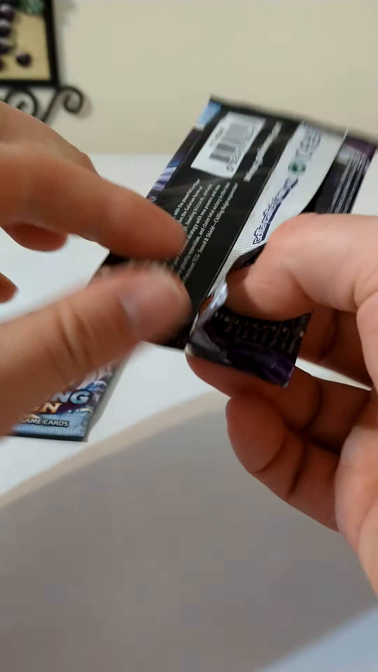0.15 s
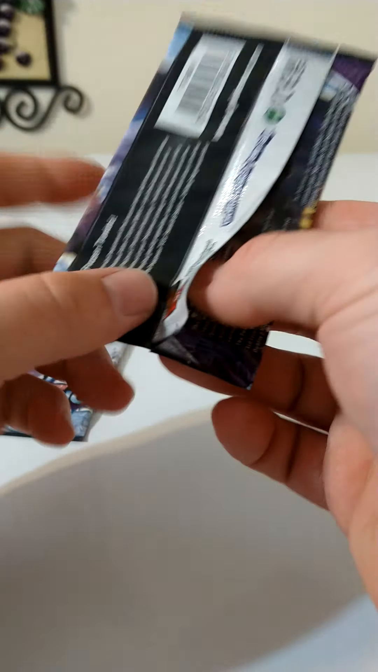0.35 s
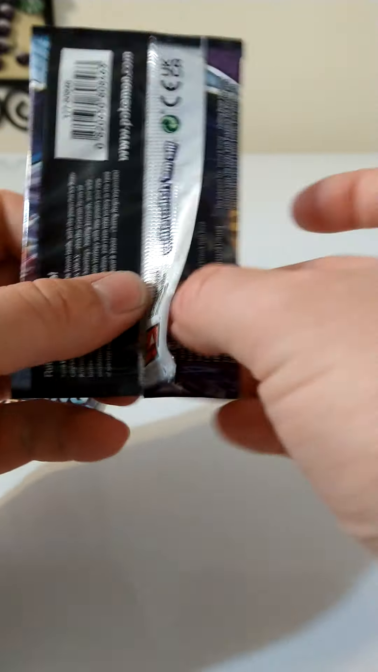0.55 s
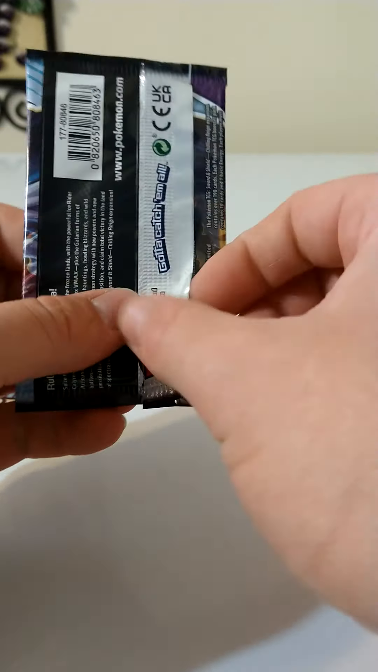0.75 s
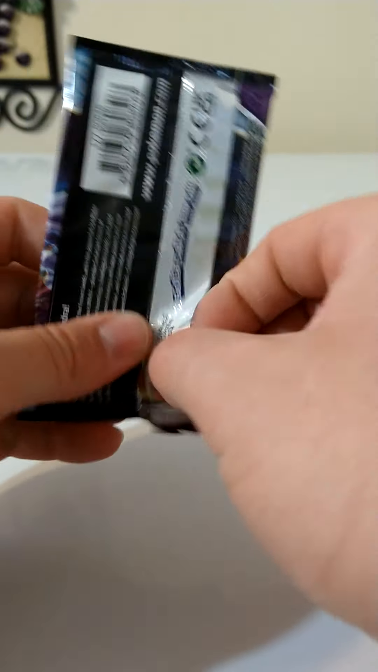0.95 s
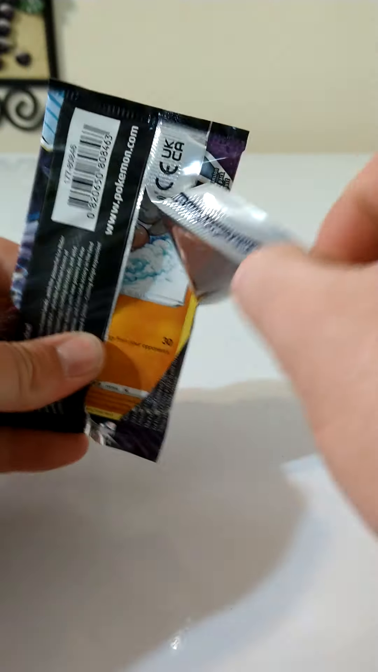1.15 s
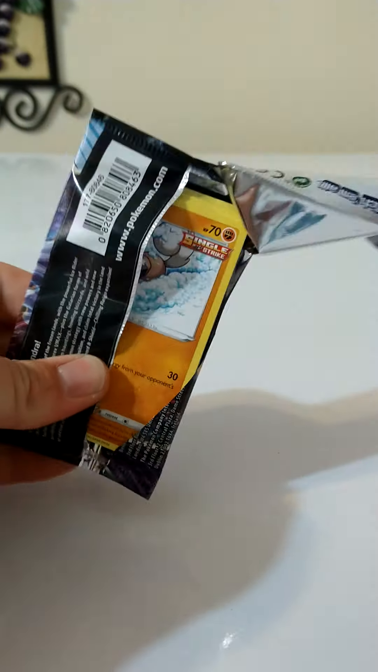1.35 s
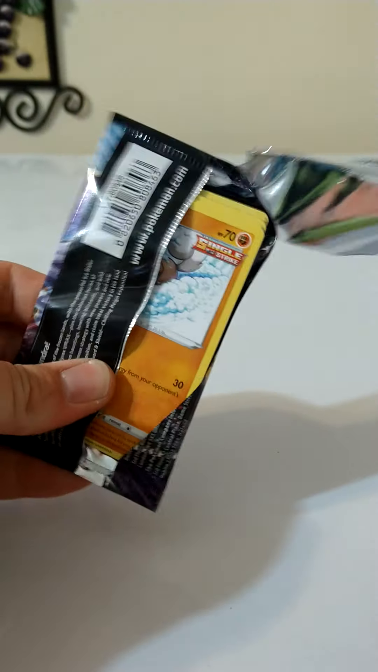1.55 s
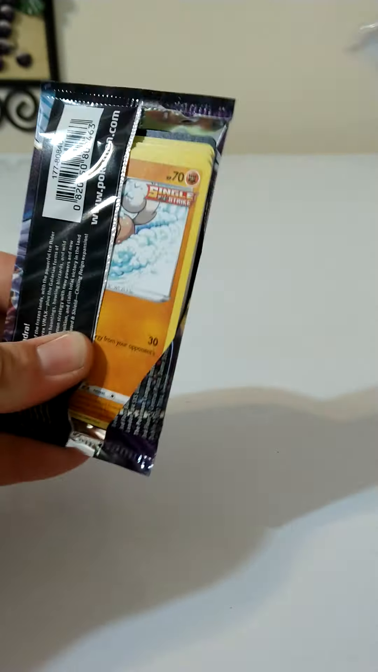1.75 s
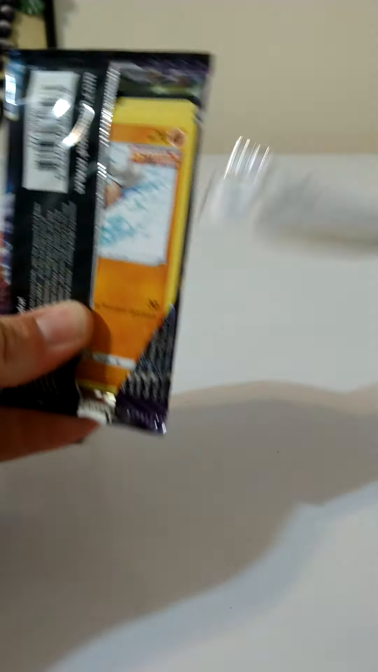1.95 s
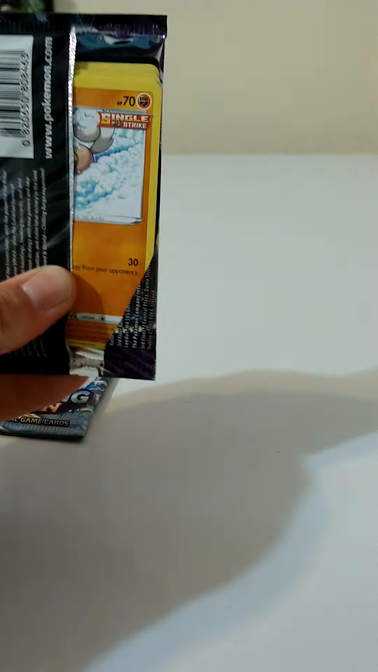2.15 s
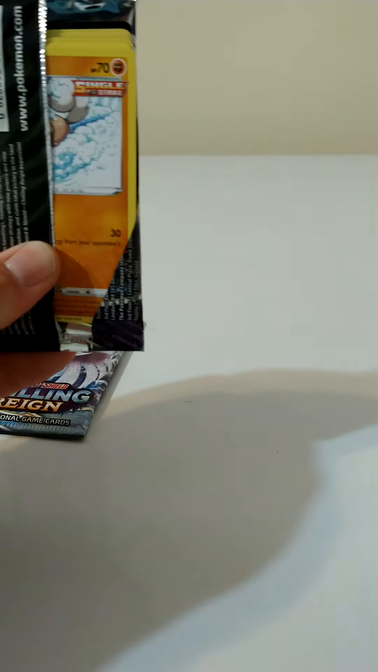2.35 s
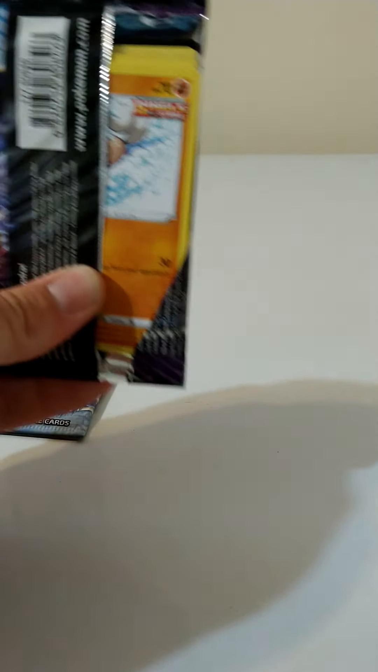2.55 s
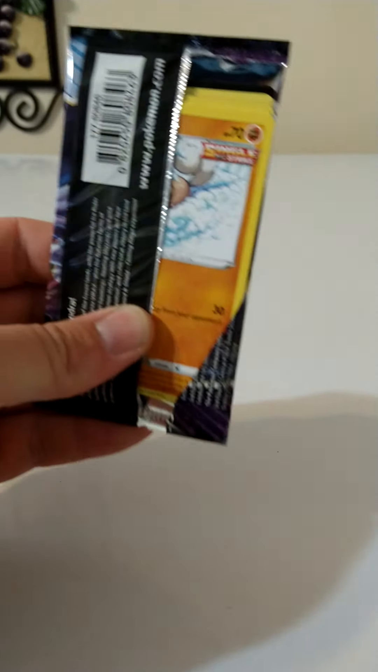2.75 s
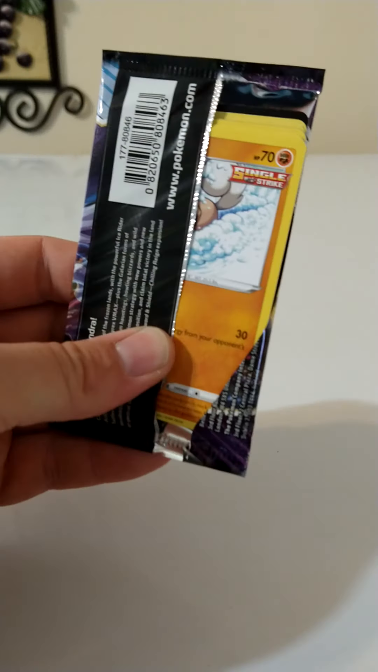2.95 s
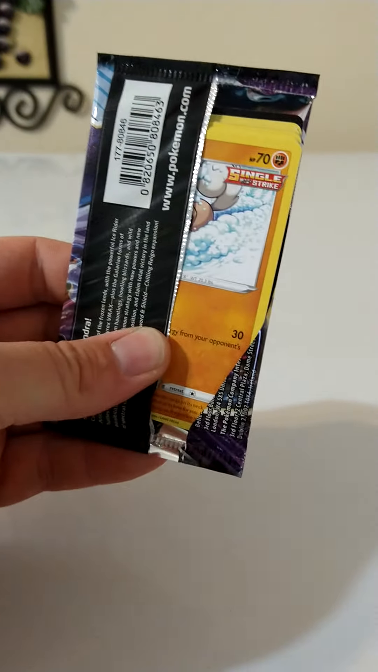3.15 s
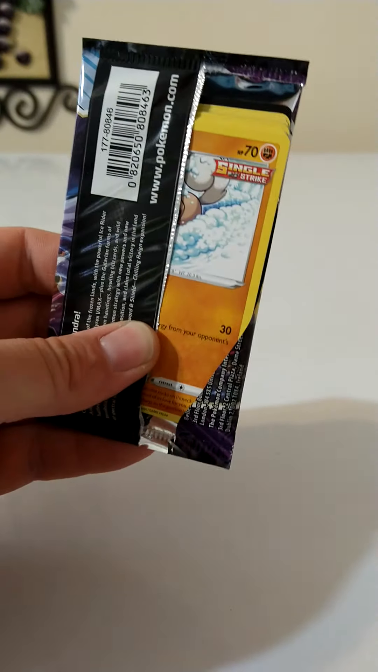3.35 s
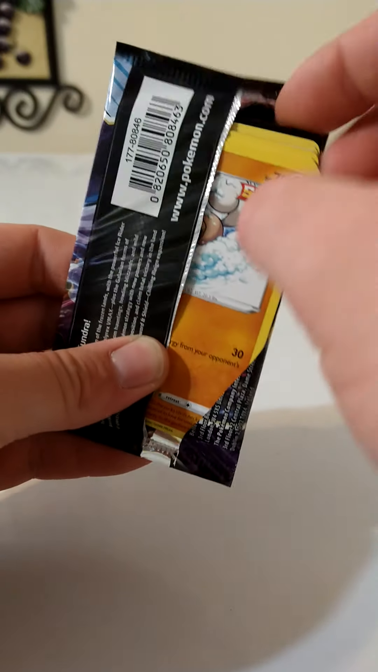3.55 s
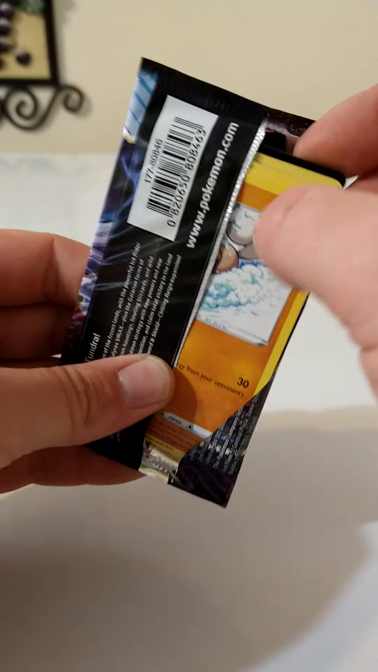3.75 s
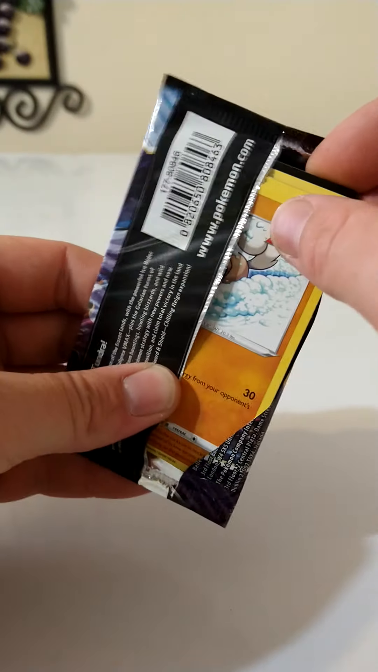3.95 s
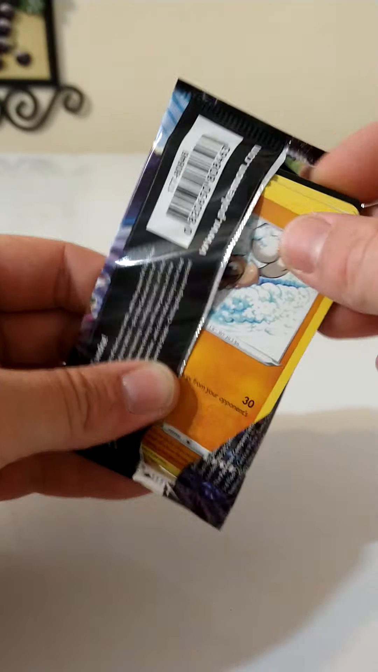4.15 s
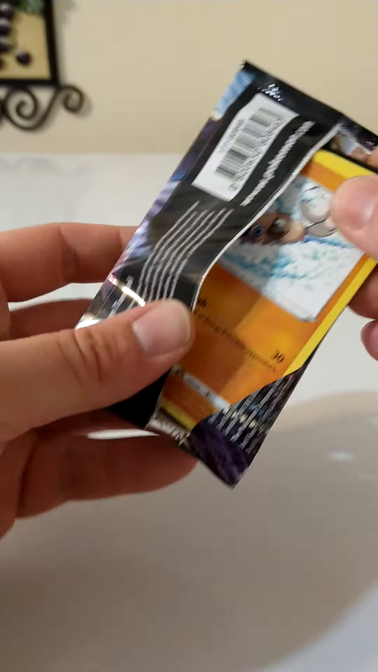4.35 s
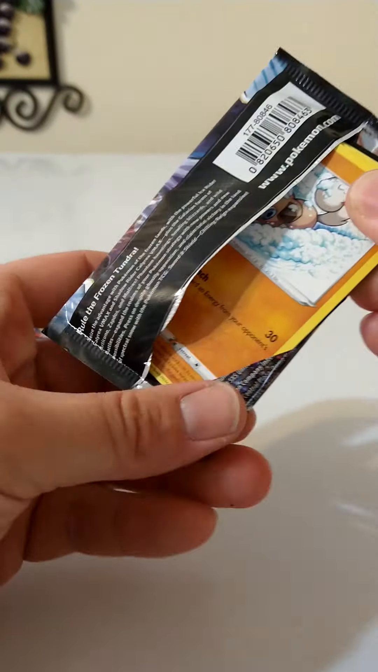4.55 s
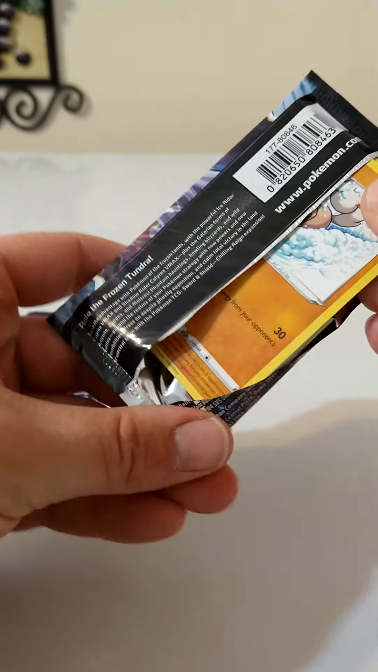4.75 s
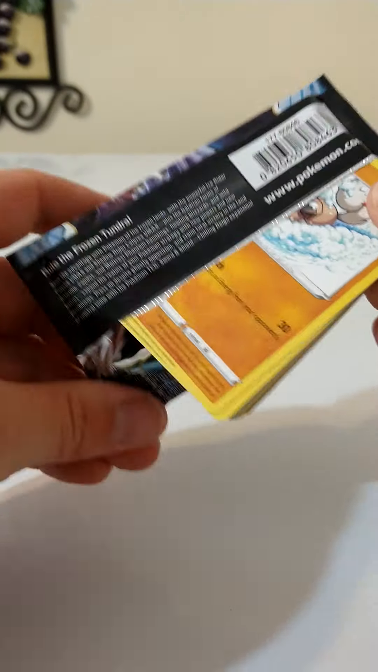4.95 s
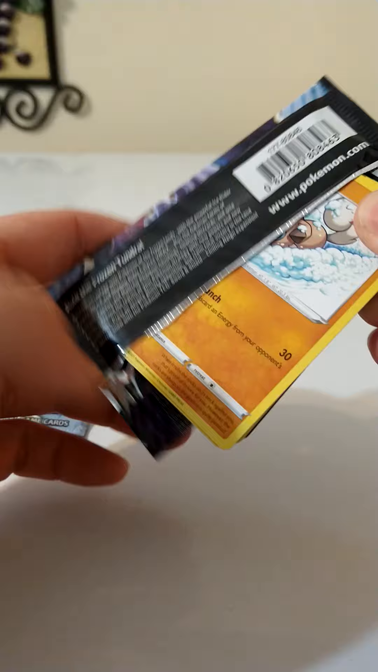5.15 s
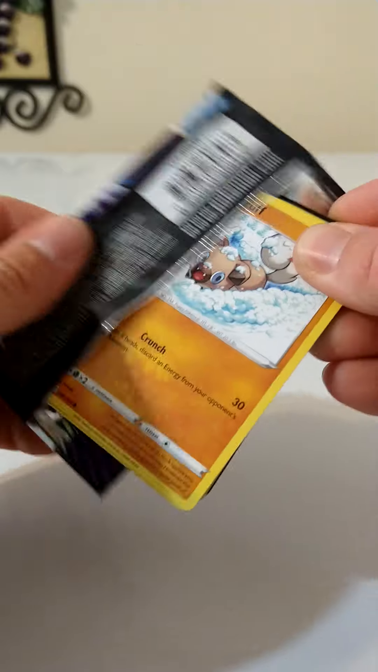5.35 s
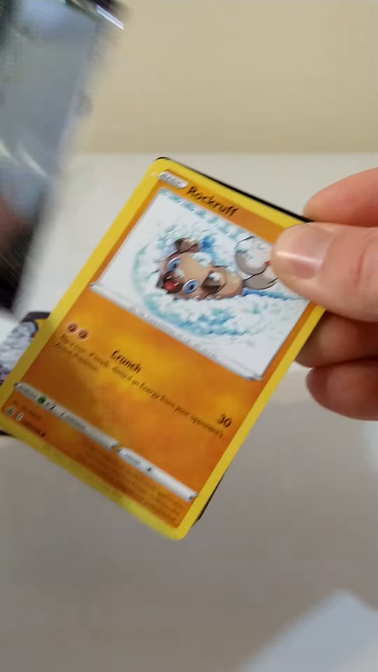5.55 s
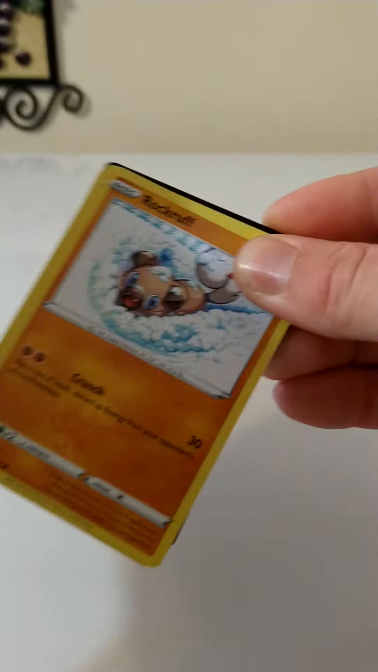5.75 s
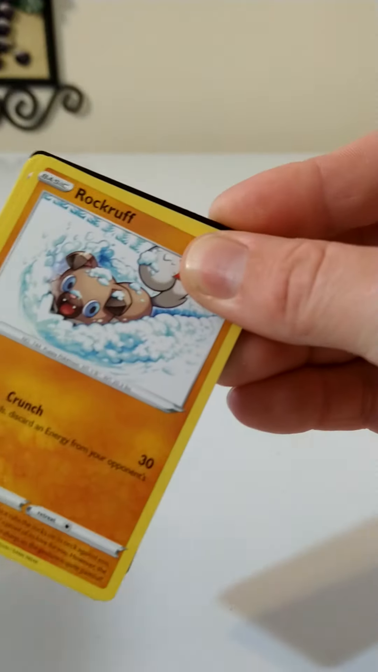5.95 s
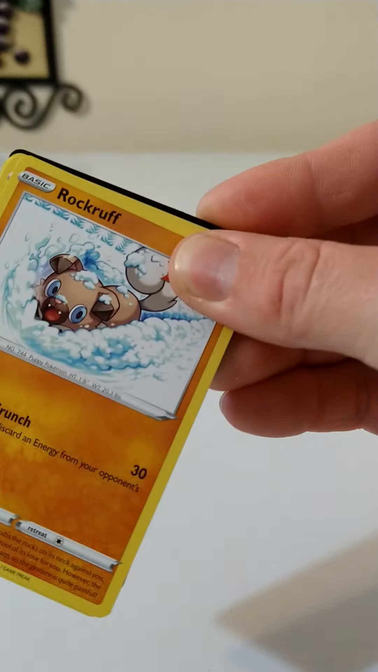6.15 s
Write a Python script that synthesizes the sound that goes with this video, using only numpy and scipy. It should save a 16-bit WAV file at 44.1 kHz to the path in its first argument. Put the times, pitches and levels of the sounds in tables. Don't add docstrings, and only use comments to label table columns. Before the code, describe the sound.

A thin foil wrapper crackles under the fingers, then rips loudly twice, bright and dry, with dull knocks from the cards inside. It settles to near silence with tiny clicks, picks up light crinkling as the cards are worked free, and bursts again when the wrapper is flung off. Soft wind-like bumps end it. Close stereo phone microphone, small room, faint low hush.

```python
import sys
import numpy as np
from scipy import signal
from scipy.fft import rfft, irfft
from scipy.io import wavfile
from scipy.ndimage import uniform_filter1d

SR = 44100
rng = np.random.default_rng(int(sys.argv[2]) if len(sys.argv) > 2 else 0)


def amplitude_ratio(level_db):
    exponent = np.asarray(level_db, float) / 20
    return 10 ** exponent


def transcribe(signal):
    frames = np.atleast_2d(signal).T
    limited = np.clip(frames, -1, 1)
    pcm = np.round(limited * 32767).astype(np.int16)
    wavfile.write(sys.argv[1], SR, pcm)


N = 277389


def evened(x):
    return x / np.sqrt(np.mean(x ** 2) + 1e-20)


def read(points, hz):
    f, value = np.transpose(points)
    return np.interp(np.log(hz + 1), np.log(f + 1), value)


def follow(rows):
    s, *columns = np.transpose(rows)
    return [np.interp(np.arange(N) / SR, s, c, -140, -140) for c in columns]


def swells(rows):
    t = np.arange(0, N + 64, 64) / SR
    power = np.zeros(len(t))
    for s, db, rise_s, fall_s in rows:
        slopes = np.where(t < s, (s - t) / rise_s, (t - s) / fall_s)
        power += amplitude_ratio(2 * db - 40 * slopes)
    return np.interp(np.arange(N) / SR, t, np.sqrt(power))


def add(mix, s, sound):
    part = mix[:, max(round(s * SR), 0):][:, :sound.shape[1]]
    part += sound[:, :part.shape[1]]


def panned(db):
    return amplitude_ratio(np.array([db / 2, -db / 2, 0 * db]))


def coloured(points, channels):
    z = rfft(rng.standard_normal((channels, N)))
    return irfft(z * amplitude_ratio(read(points, np.fft.rfftfreq(N, 1 / SR))), N)


# frequency in Hz, density in dB per Hz.
HUSH_SPECTRUM = [(20, -47), (36, -22.5), (55, 0.5), (110, -4.5), (240, -1), (370, -2), (640, -7),
                 (950, -13), (1700, -13.5), (2500, -18), (4500, -22), (8500, -25.5), (11000, -32),
                 (15600, -29.5), (16500, -50)]
# frequency in Hz, likeness from 0 to 1.
HUSH_LIKENESS = [(60, 0.86), (240, 0.91), (950, 0.053), (3770, 0.01), (15000, 0.01)]
# frequency in Hz, left-right difference in dB.
HUSH_BALANCE = [(60, 0.0), (380, -1.5), (2380, -0.5), (15000, -2.5)]


def hush(level_db=-64.5, hum_hz=120.0, hum_db=-76):
    hz = np.fft.rfftfreq(N, 1 / SR)
    a, b = rfft(coloured(HUSH_SPECTRUM, channels=2))
    same = np.clip(read(HUSH_LIKENESS, hz), -1, 1)
    partly_alike = np.array([a, same * a + np.sqrt(1 - same ** 2) * b])
    pair = irfft(partly_alike * panned(read(HUSH_BALANCE, hz))[:2], N)
    hum = amplitude_ratio(hum_db) * np.sin(2 * np.pi * hum_hz * np.arange(N) / SR)
    return amplitude_ratio(level_db) * pair / np.sqrt(np.mean(pair.mean(0) ** 2)) + hum


# frequency in Hz, time to decay by 60 dB in seconds.
ROOM_DECAY = [(400, 0.32), (1300, 0.19), (3500, 0.15), (9000, 0.13), (16000, 0.061)]


def room(x):
    half_s = SR // 2
    taps = np.zeros((2, half_s))
    at = np.arange(120, half_s - 20, 20) + rng.integers(0, 20, (2, (half_s - 121) // 20))
    np.put_along_axis(taps, at, rng.choice([-1., 1.], at.shape), 1)
    hz, t, z = signal.stft(taps, SR, nperseg=128)
    z[1] = np.where(hz[:, None] < 700, z[0], z[1])
    decay = amplitude_ratio(-60 * t / read(ROOM_DECAY, hz)[:, None])
    tail = signal.istft(z * decay, SR, nperseg=128)[1]
    return signal.oaconvolve(x, tail / np.linalg.norm(tail[0]), axes=1)[:, :N]


# frequency in Hz, density in dB per Hz.
BUFFET_SPECTRUM = [(15, -53.5), (25, -31.5), (59, -5), (102, 1), (191, -12), (260, -21), (362, -26),
                   (485, -35.5), (600, -32), (780, -61), (1320, -120)]
# peak time in seconds, level in dB,
# seconds to rise 20 dB, seconds to fall 20 dB.
AIR_PUFFS = [(1.226, -50, .03, .021), (1.435, -53, .08, .06), (1.528, -57, .1, .04), (1.75, -61, .15, .04),
             (3.196, -56, .035, .05), (5.02, -53, .021, .1), (5.132, -55, .033, .023),
             (5.19, -55, .035, .17), (5.358, -53.5, .075, .11), (5.472, -51, .034, .022),
             (5.522, -53, .016, .053), (5.618, -54, .05, .07), (5.738, -47.5, .027, .2),
             (5.862, -43, .07, .15), (5.96, -44.5, .1, .06), (6.05, -59, .1, .3)]


def draught(right_db=-17.5):
    smooth = uniform_filter1d(rng.standard_normal(N), 400)
    lumps = evened(uniform_filter1d(smooth, 400))
    air = evened(coloured(BUFFET_SPECTRUM, channels=1)[0] * amplitude_ratio(4.6 * lumps))
    level = amplitude_ratio(11.5) * swells(AIR_PUFFS)
    return np.array([air, amplitude_ratio(right_db) * air[::-1]]) * uniform_filter1d(level, 300)


# start in seconds, peak in dB, pitch in Hz.
STACK_KNOCKS = [(1.136, -32, 1300), (1.168, -28, 1150), (1.268, -37, 340), (1.403, -29, 650),
                (1.42, -26, 1900), (1.441, -27, 700), (1.659, -39, 760), (1.701, -29, 1050),
                (1.755, -41, 630), (2.778, -46, 820), (3.702, -50, 680)]


def knocks(cycles=24.):
    out, t = np.zeros((3, N)), np.arange(SR // 5) / SR
    for s, db, hz in STACK_KNOCKS:
        modes = np.sin(2 * np.pi * hz * t) + .6 * np.sin(2 * np.pi * 1.17 * hz * t)
        onset = np.tanh(t * hz / 2)
        ring = onset * modes * amplitude_ratio(db + 7 - 60 * t * hz / cycles)
        add(out, s, panned(-6.0)[:, None] * ring * [[1], [1], [.5]])
    return out


# time in seconds, level in dB.
SEAM_STRAIN = [
    (.82, -85),
    (.86, -61),
    (.95, -64),
    (1.04, -62),
    (1.09, -56),
    (1.14, -37),
    (1.17, -70),
]


def seam(ring_hz=5200., width_hz=450., slips_per_s=700):
    slips = rng.standard_normal((3, N)) * (rng.random((3, N)) < slips_per_s / SR)
    band = signal.butter(1, ring_hz + width_hz * np.array([-.5, .5]), "band", fs=SR)
    ringing = signal.lfilter(*band, signal.lfilter(*band, slips))
    return amplitude_ratio(follow(SEAM_STRAIN)[0]) * evened(ringing)


# frequency in Hz, density in dB per Hz.
FOIL_SPECTRUM = [(880, -40), (1500, -17.5), (2450, -4.5), (2680, -6), (3310, -2.5), (7620, 0),
                 (10500, -4.5), (12100, -9.5), (14100, -6), (15500, -12), (16500, -39)]
# frequency in Hz, density in dB per Hz.
SLAP_SPECTRUM = [(120, -25.5), (330, -9), (480, -12.5), (680, -6), (1200, -5), (2000, -8.5), (4000, -26.5)]


def snap(ring_hz, slap_db, ring_db=8.5, width=.22, burst_s=.0008, spread_s=.0022, slap_s=.0032,
         alike=.6, port_gap_s=.00027):
    t, hz = np.arange(1024) / SR, np.fft.rfftfreq(1024, 1 / SR)
    left, right, low = rng.standard_normal((1024, 3)).T
    ports = np.array([left, alike * left + (1 - alike) * right])
    burst = rfft(ports * t * np.exp(-t / burst_s))
    burst = np.vstack([burst, np.ones(len(hz))])

    octave_like = np.log((hz + 1) / ring_hz)
    colour_db = read(FOIL_SPECTRUM, hz) + ring_db * np.exp(-(octave_like / width) ** 2)
    colour_db -= 2.4 * abs(octave_like)
    bending = np.exp(-4j * np.pi * spread_s * np.sqrt(4000 * (hz + 1500.)))
    crack = irfft(burst * amplitude_ratio(colour_db) * bending)
    crack /= np.linalg.norm(crack, axis=1)[:, None]
    slap = irfft(rfft(low * np.exp(-t / slap_s)) * amplitude_ratio(read(SLAP_SPECTRUM, hz)) * bending)

    swell = uniform_filter1d((crack[:2] ** 2).sum(0), 32)
    rows = crack / np.sqrt(swell.max())
    rows = rows + amplitude_ratio(slap_db) * panned(-5.0)[:, None] * slap / abs(slap).max()
    rows = np.roll(rows, 120 - swell.argmax(), axis=1) * signal.windows.tukey(1024, .04)
    rows[1] = np.roll(rows[1], round(port_gap_s * SR * rng.uniform(-.3, 1.3)))
    return rows


# time in seconds, crackle level in dB.
RESTING_FINGERS = [(0.0, -62), (0.37, -66), (0.83, -71), (0.87, -64), (1.04, -70), (1.8, -61), (2.36, -67),
                   (2.72, -84), (3.6, -92), (4.85, -76), (5.0, -70), (6.3, -82)]
# peak time in seconds, level in dB,
# seconds to rise 20 dB, seconds to fall 20 dB.
FOIL_SQUEEZES = [(0.0, -47, .01, .19), (1.058, -56, .021, .07), (1.114, -37, .017, .1),
                 (1.176, -29, .1, .04), (1.221, -30, .05, .054), (1.342, -55, .06, .1),
                 (1.449, -19.5, .055, .056), (1.626, -39.5, .03, .11), (1.705, -29.5, .015, .08),
                 (1.765, -34, .1, .045), (2.784, -72, .04, .18), (3.071, -54, .021, .035),
                 (3.144, -60, .015, .1), (3.69, -66, .03, .3), (3.886, -49, .025, .13),
                 (4.107, -54.5, .017, .27), (4.318, -50, .09, .08), (4.46, -47.5, .03, .09),
                 (4.687, -56.5, .05, .075), (4.821, -49.5, .08, .07), (5.021, -45, .017, .1),
                 (5.056, -33.5, .06, .09), (5.228, -42, .03, .11), (5.333, -54, .021, .12),
                 (5.488, -38, .025, .07), (5.564, -33.5, .1, .026), (5.765, -47.5, .1, .125),
                 (5.943, -62, .1, .2), (6.158, -53, .018, .058), (6.238, -56, .017, .075)]


def crackle(per_s=1200.0, spread_db=3.2, count=16):
    happens = rng.random(N) < per_s / SR
    size = amplitude_ratio(spread_db * np.minimum(rng.exponential(1, N), 3)) * happens
    kind, out = rng.integers(0, count, N), np.zeros((3, N))
    for k, ring_hz in enumerate(np.geomspace(4000, 10000, count)):
        hits = (size * (kind == k))[None]
        out += signal.oaconvolve(hits, snap(ring_hz, -18), axes=1)[:, :N]
    level = np.hypot(amplitude_ratio(follow(RESTING_FINGERS)[0]), swells(FOIL_SQUEEZES))
    return level * evened(out)


# onset in seconds, peak in dB, # ringing pitch of the facet
# in Hz, slap of the whole pack in dB relative to the snap.
GRIP_SNAPS = [(.003, -18.5, 9100, -28), (.0086, -23.5, 4300, -27), (.0279, -23.5, 8500, -24),
              (.0402, -22, 7460, -48), (.0801, -31.5, 6440, -15), (.2592, -34, 5900, -18),
              (.2848, -41.5, 5530, -18), (.3636, -27, 6130, -15), (.5241, -41, 3600, -3.5),
              (.5472, -41.5, 4470, -34), (.677, -37, 8700, -11.5), (.7019, -46, 4300, -16),
              (.7251, -36, 5270, -18), (.7321, -34.5, 6700, -9.5), (.7357, -39, 6800, -16),
              (.8515, -38.5, 8100, -17), (.9121, -43, 8400, -15), (.9201, -42, 7900, -17),
              (.9367, -34, 6850, -19), (.964, -31, 5800, -13), (1.0091, -33.5, 5300, -15)]
FIRST_RIP_SNAPS = [(1.052, -19, 5300, -18), (1.1078, -22, 5100, -26), (1.1128, -17, 5100, -27),
                   (1.1263, -23, 5000, -22), (1.131, -21, 6200, -12), (1.1434, -11, 4900, -20),
                   (1.1515, -5.5, 4900, -27), (1.1598, -14, 4700, -13), (1.17, -7, 7800, -14),
                   (1.1751, -11, 7900, -15), (1.2036, -16, 5000, -21), (1.2133, -5, 8200, -24),
                   (1.2292, -18, 6100, -22), (1.2615, -17.5, 6400, -12), (1.2716, -31, 6900, -8),
                   (1.3147, -37, 5000, -8)]
LATER_RIP_SNAPS = [(1.3426, -31, 7100, -6), (1.3808, -27, 4300, -8), (1.4073, -9, 5200, -15),
                   (1.4213, -3.5, 5800, -19), (1.4275, -5, 8700, -22), (1.4417, -10, 9000, -14),
                   (1.4467, -9, 5300, -15), (1.4521, -8, 8700, -19), (1.4692, -19, 6200, -20),
                   (1.4745, -19, 7800, -20), (1.4822, -23, 7000, -9), (1.5677, -42, 7600, -18),
                   (1.6061, -36, 4200, -15), (1.6203, -15.5, 4800, -26), (1.6513, -28, 7700, -23),
                   (1.6611, -20, 6200, -11), (1.6954, -18, 7500, -16), (1.6991, -15, 10300, -18),
                   (1.706, -15, 7000, -10), (1.7092, -4.5, 3500, -24), (1.7214, -12, 3800, -27),
                   (1.7462, -26, 6200, -17), (1.7606, -23, 3600, -18), (1.771, -26, 4600, -18),
                   (1.7801, -27, 5000, -19)]
HOLD_SNAPS = [(1.8434, -48, 2580, -3), (1.8888, -30, 6000, -37), (1.8923, -31, 8100, -30),
              (1.914, -43, 8100, -13), (2.0387, -46, 4100, 3), (2.2019, -46.5, 2700, -1),
              (2.2899, -49, 3200, 4), (2.351, -52, 9200, -15), (2.5335, -51, 7800, -18),
              (2.7791, -36, 6590, -8), (2.8446, -40.5, 3960, -6), (2.874, -30.5, 5120, -10),
              (2.8984, -45.5, 2600, -6.5), (3.0649, -43, 5400, -9), (3.1358, -35.5, 5500, -10),
              (3.187, -52, 5000, -11)]
SLIDE_SNAPS = [(3.6521, -41, 4400, -5), (3.7033, -31.5, 7540, -7.5), (3.7425, -39, 4360, -32),
               (3.834, -36, 7100, -16), (3.878, -28, 4070, -29), (3.8829, -23, 8910, -26.5),
               (3.9735, -45, 3900, -7), (4.0988, -39.5, 4000, -13), (4.1021, -29.5, 4230, -19),
               (4.1357, -38, 4780, -23), (4.1433, -28, 4280, -13), (4.294, -34.5, 7900, -33),
               (4.3009, -34, 8700, -24), (4.3191, -37, 5500, -31), (4.444, -45, 4200, -6),
               (4.4554, -30.5, 7000, -14), (4.4723, -41, 8700, -18), (4.5263, -35.5, 4120, -10.5),
               (4.534, -38, 4930, -13.5), (4.64, -44, 4010, -6.5), (4.659, -45, 4370, -8.5),
               (4.6789, -33, 4600, -39), (4.6866, -28, 4900, -25), (4.8093, -39, 5030, -32),
               (4.8143, -36.5, 5800, -15), (4.8195, -31.5, 5000, -10), (4.908, -49, 2660, 4),
               (4.958, -38, 4460, -12)]
FLING_SNAPS = [(4.9925, -35, 6100, -23), (5.01, -18, 7600, -10), (5.0164, -3, 7960, -31),
               (5.051, -10, 8500, -13.5), (5.0533, -10.5, 8150, -22.5), (5.1568, -27, 8200, -12),
               (5.183, -24.5, 8400, -16), (5.2125, -19, 7940, -19), (5.2252, -13, 8340, -20),
               (5.2704, -30, 5440, -17), (5.3269, -24, 7700, -32), (5.454, -36, 4900, -8),
               (5.4848, -31.5, 2880, -26), (5.4956, -26, 11300, -21), (5.5162, -23, 9000, -14),
               (5.5346, -21, 6400, -12), (5.5419, -27, 6100, -18), (5.5616, -24, 9500, -16),
               (5.5653, -30, 9000, -6), (5.7658, -36, 8400, -3.5), (5.893, -45, 2600, -3),
               (5.9385, -29, 6970, -16), (6.1519, -35.5, 5620, -15.5), (6.1892, -41.5, 8450, -10.5),
               (6.233, -29.5, 5800, -9)]
ACTION_SIDES = [
    1.5,
    0.6,
    0.4,
    1.2,
    1.5,
    0.3,
]


def creases(scatter_db=2.5):
    out = np.zeros((3, N))
    actions = (GRIP_SNAPS, FIRST_RIP_SNAPS, LATER_RIP_SNAPS, HOLD_SNAPS, SLIDE_SNAPS, FLING_SNAPS)
    for rows, pan_db in zip(actions, ACTION_SIDES):
        for s, db, ring_hz, slap_db in rows:
            side = panned(pan_db + scatter_db * rng.standard_normal())[:, None]
            add(out, s - .002, amplitude_ratio(db - 0.1) * side * snap(ring_hz, slap_db + 0.1))
    return out


def scene(room_db=-9):
    foil = creases() + crackle() + seam() + knocks()
    direct, to_walls = foil[:2], foil[2:]
    return direct + amplitude_ratio(room_db) * room(to_walls) + draught() + hush()


def band_limit(x):
    return signal.sosfilt(signal.butter(12, 15800, fs=SR, output="sos"), x)


def record(dry):
    mix = 1.259 * np.tanh(dry / 1.337)
    return band_limit(mix)


dry = scene()
out = record(dry)
transcribe(out)
```